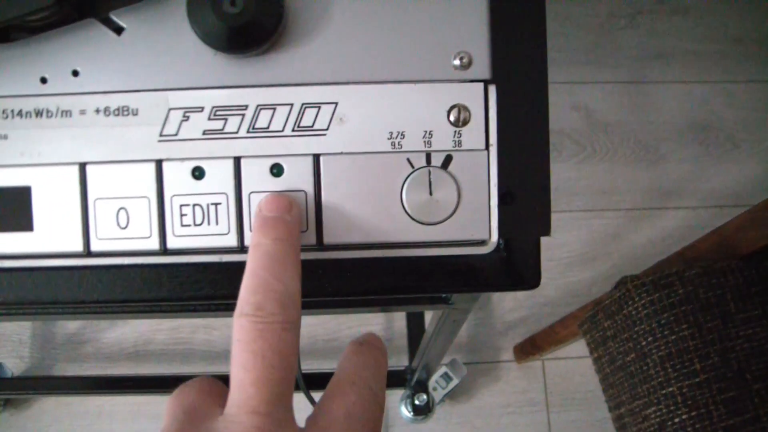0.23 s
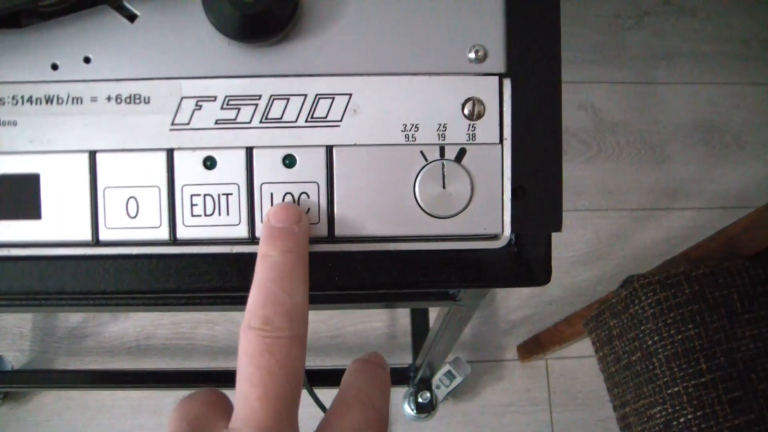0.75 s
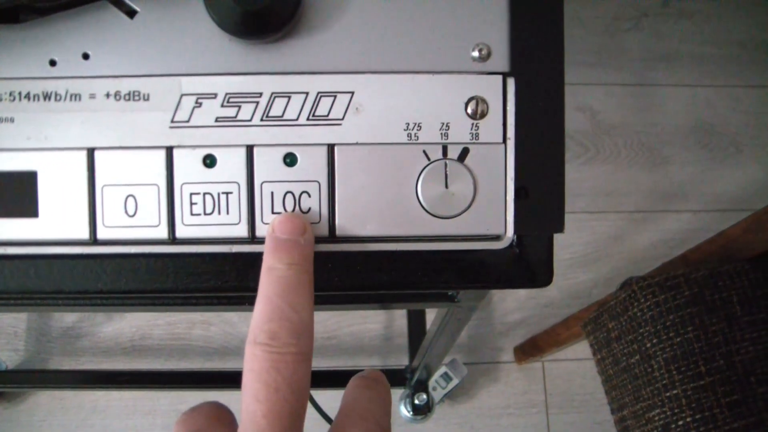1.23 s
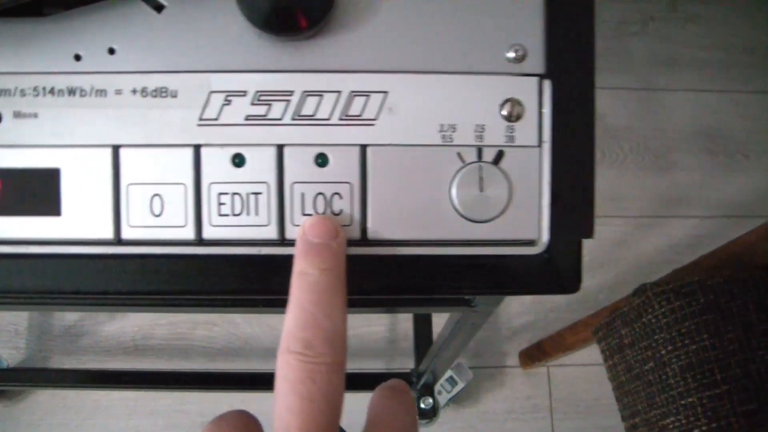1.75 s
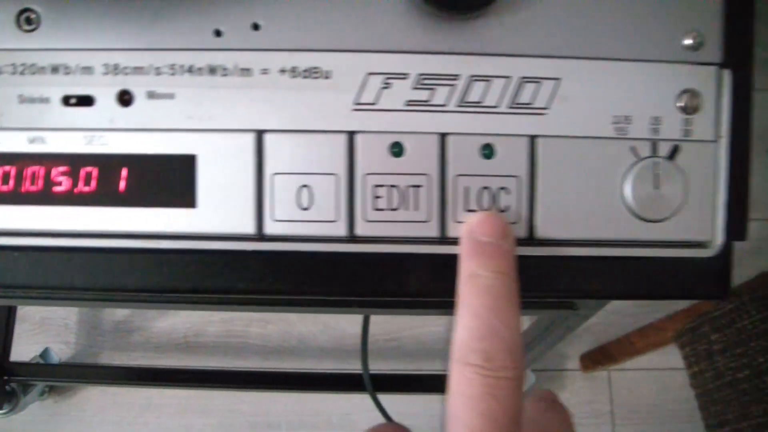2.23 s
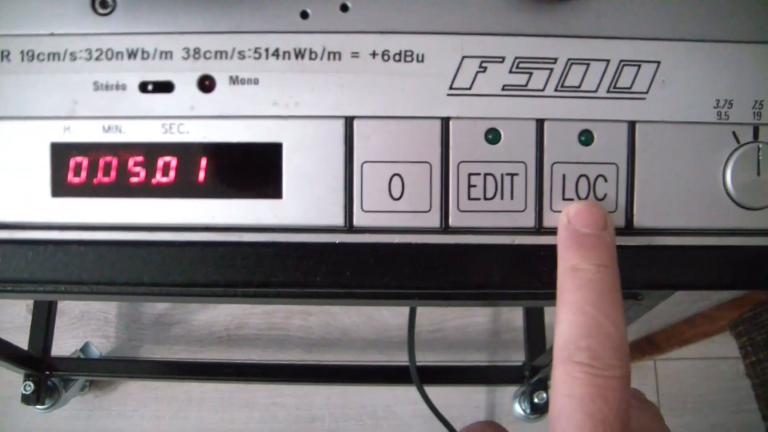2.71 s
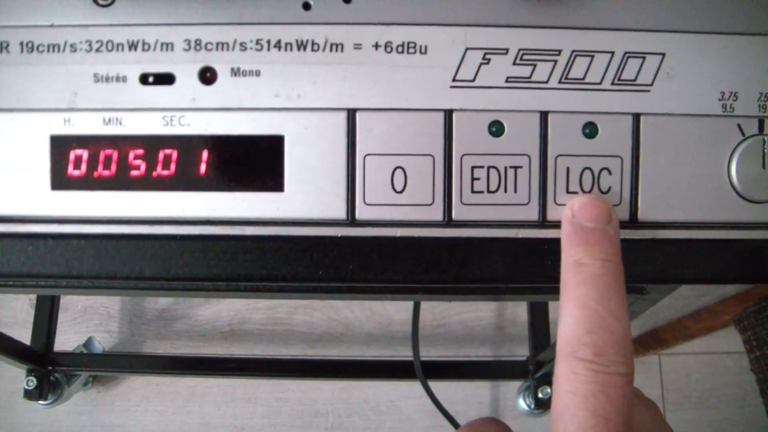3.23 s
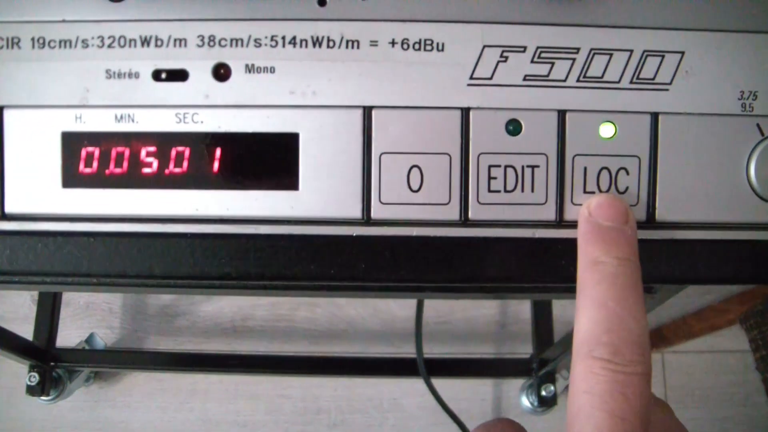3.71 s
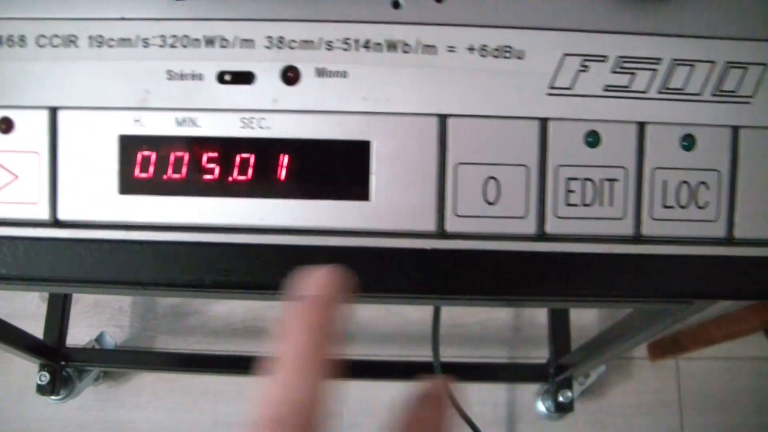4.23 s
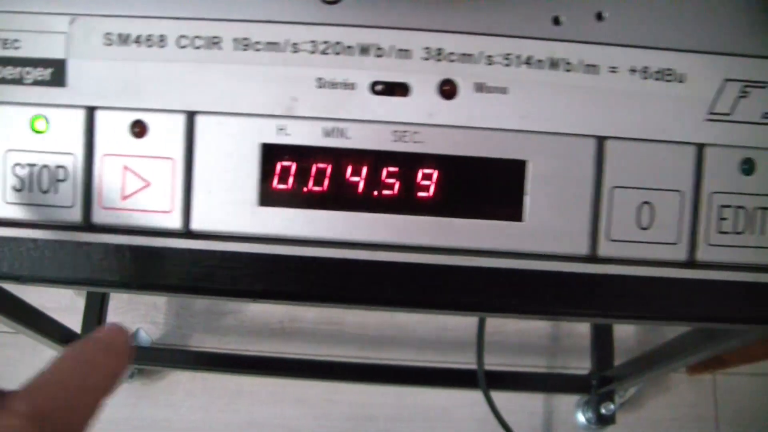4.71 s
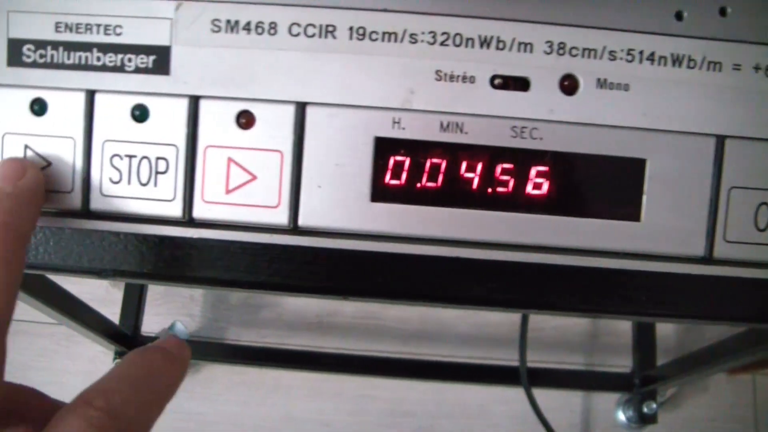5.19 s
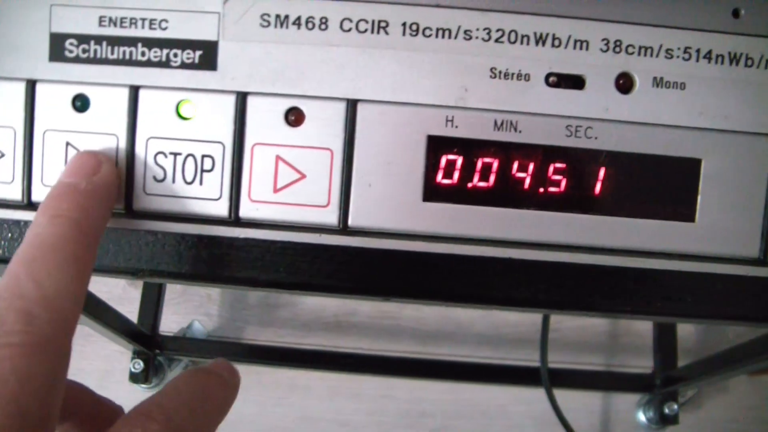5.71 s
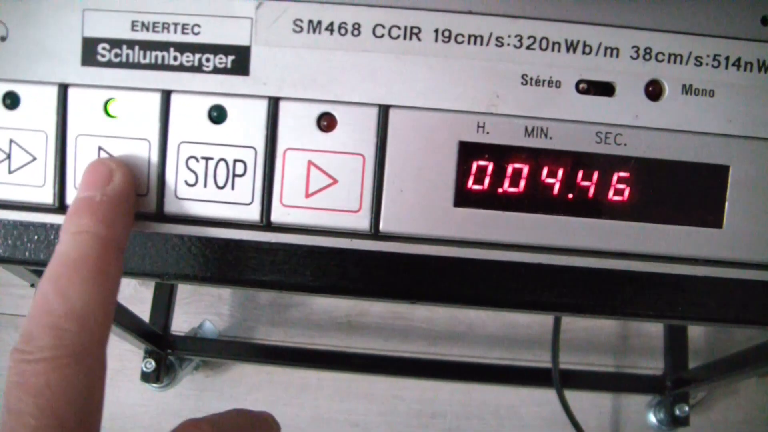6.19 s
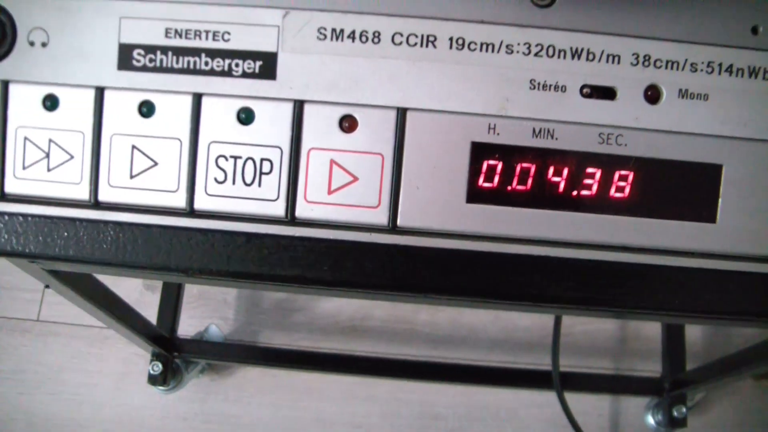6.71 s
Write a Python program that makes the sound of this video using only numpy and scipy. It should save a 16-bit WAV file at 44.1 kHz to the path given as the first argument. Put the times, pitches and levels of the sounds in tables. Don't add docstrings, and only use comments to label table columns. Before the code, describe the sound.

Close stereo pickup in a small, lightly reverberant room: soft hiss, mains hum, faint high whistle and a far wall clock alternating tick and tock. A cluster of clicks ends in one hard, bright mechanical blow with a short springy rattle. Immediately the reels start turning, separate soft knocks blurring into a rough metallic purr that rises steadily in pitch, brightness and loudness, with airy tape hiss on top.

```python
import sys
import numpy as np
from scipy import signal
from scipy.fft import rfft, irfft, next_fast_len
from scipy.io import wavfile
from scipy.ndimage import map_coordinates

SR = 44100
rng = np.random.default_rng(int(sys.argv[2]) if len(sys.argv) > 2 else 0)


def invert_db(level):
    return 10 ** (np.asarray(level, dtype=float) / 20)


def inscribe(sig):
    pcm = np.round(np.clip(np.atleast_2d(sig).T, -1, 1) * 32767)
    wavfile.write(sys.argv[1], SR, pcm.astype(np.int16))


N = 306495
TIME_S = np.arange(N) / SR
BALLS, INNER_SHARE = 11, .6285


def unit(x):
    return x / np.sqrt(np.mean(x ** 2) + 1e-20)


def along(points, hz):
    f, v = np.transpose(points)
    return np.interp(np.log(hz + 1), np.log(f + 1), v)


def curves(rows):
    s, *cols = np.transpose(rows)
    return [np.interp(TIME_S, s, c) for c in cols]


def wobble(rate):
    knots = rng.standard_normal(int(N * rate / SR) + 4)
    return map_coordinates(knots, [TIME_S * rate])


def filtered(x, response):
    m = next_fast_len(N + SR // 2)
    return irfft(rfft(x, m) * response(np.fft.rfftfreq(m, 1 / SR)), m)[..., :N]


def band(x, lo_hz, hi_hz):
    return unit(filtered(x, lambda f: 1 / (1 + (lo_hz / (f + 1)) ** 8) / (1 + (f / hi_hz) ** 8)))


def resonances(peaks):
    def response(f):
        total = 0
        for k, (hz, width, db) in enumerate(peaks):
            damping = 1j * f * width
            total = total + (-1) ** k * invert_db(db) * damping / (hz * hz - f * f + damping)
        return total
    return response


def ring(modes, t, scatter_db):
    out = 0
    for hz, db, t60 in modes:
        out = out + invert_db(db + scatter_db * rng.normal() - 60 * t / t60) * np.sin(2 * np.pi * hz * t)
    return out


def add_at(out, s, sound):
    out[round(s * SR):][:len(sound)] += sound


def placed(x, lag, pan_db):
    sides = np.array([[1], [-1]])
    return filtered(x, lambda f: invert_db(pan_db * sides) * np.exp(1j * np.pi * f * lag / SR * sides))


def race(rate_hz, sway, scatter_db):
    passes = np.cumsum(rate_hz) / SR + sway
    at = np.flatnonzero(np.diff(np.floor(passes)) > 0)
    late = (np.ceil(passes[at]) - passes[at]) / (passes[at + 1] - passes[at])
    size = invert_db(scatter_db * rng.standard_normal(len(at))) * np.sqrt(SR / 150)
    knocks = np.bincount(at, size * (1 - late), N) + np.bincount(at + 1, size * late, N)
    return filtered(knocks, lambda f: (1j * f / (800 + 1j * f)) ** 2)


# multiple of the knock rate, shaft steps aside,
# level over their neighbours in dB.
OVERTONES = [(2, -2, -8), (4, -4, -5), (7, 0, 3), (9, 0, 1), (11, 0, 3), (12, -1, 0), (16, 0, 9),
             (18, 1, 6), (20, 0, 4), (21, 0, 7), (22, 0, 7), (23, 0, 10.5), (27, 1, 8), (28, 1, 7)]


def singers(inner_hz, shaft):
    knock_phase = BALLS * INNER_SHARE * shaft
    out = 0
    for k, step, db in OVERTONES:
        bloom = 1
        if k > 12:
            hz = k * inner_hz
            bloom = 1.6 * np.clip(hz / 2900, 0, 1) ** 5 * np.clip(3500 / hz, 0, 1) ** 14
        tone = np.sin(k * knock_phase + step * shaft + .15 * wobble(20))
        out = out + bloom * invert_db(db + 1.2 * wobble(5)) * tone
    return 2 * inner_hz / np.sqrt(SR * 150) * out


# time in seconds, inner-race knocks a second.
SPIN_UP = [(4.4, 2), (4.8, 26), (5.2, 56), (5.6, 86), (6.6, 164.1), (6.95, 190.4)]
# frequency in Hz, width in Hz, level in dB.
DECK_MODES = [(268, 12, -8), (320, 25, -6), (627, 41.4, -4.5), (757.5, 37, -5.5), (1106, 210, -13),
              (1390, 57, -5), (1566, 49, -9), (1904, 63, -2), (2126, 93, 1), (2280, 30, 1.5),
              (2976, 130, -8.5), (3335, 330, -4), (3870, 200, -7), (4264, 110, -3), (4670, 220, -6.5),
              (7340, 220, 11)]
# frequency in Hz, level in dB per Hz.
WHIRR_TONE = [(120, -45), (200, 0.5), (601, -7), (883, -13.5), (2090, -1.5), (2560, 5), (3310, -3.5),
              (3690, -19.5), (7270, -40.5), (11900, -40), (13300, -39), (15100, -33.5), (16000, -57)]
# frequency in Hz, left over right in dB.
BEARING_LEAN = [(60, 2), (110, -0.5), (200, -2.5), (380, 0), (700, -0.5), (1290, 0.5), (2380, 2.5),
                (4400, 4.5), (8120, -6), (15000, 3)]
# time in seconds, hiss lift in dB.
TAPE_BRUSHES = [
    (5.01, 4),
    (5.89, 4),
]


def spool():
    inner_hz, = curves(SPIN_UP)
    full_hz = 190
    doublings = np.log2(inner_hz / full_hz)
    shaft = 2 * np.pi * np.cumsum(inner_hz / (BALLS * INNER_SHARE)) / SR
    inner = race(inner_hz, .009 * np.sin(shaft) + .003 * wobble(40), scatter_db=2)
    inner *= 1 + .25 * np.cos(shaft)
    outer = race(inner_hz * (1 / INNER_SHARE - 1), .002 * wobble(40), scatter_db=2)
    rolling = rng.standard_normal((2, N)) * invert_db(1.3 * wobble(60) + .4 * wobble(9))
    near = placed(inner + singers(inner_hz, shaft) + invert_db(-6) * rolling[0], lag=5.5, pan_db=0)
    far = placed(invert_db(-4) * outer + invert_db(-8) * rolling[1], lag=4, pan_db=0)

    def lean(f):
        return invert_db(along(BEARING_LEAN, f) * [[.5], [-.5]])

    def deck(f):
        return (resonances(DECK_MODES)(f) + invert_db(along(WHIRR_TONE, f) - 14.5)) * lean(f)

    x = filtered(near + far, deck)
    low_db = -8.6 - 1.9 * doublings
    mix = band(x, 940, 2414) + invert_db(low_db + 1.16 * wobble(3.98)) * band(x, 195, 970)
    plate_db = np.minimum(-25 - 8.5 * doublings, -5.5)
    plate_awake = np.clip(inner_hz / 36, 0, 1) ** 2
    mix += invert_db(plate_db) * plate_awake * band(x, 2020, 2450)
    presence = 0.26 * (inner_hz / 150) * band(x, 3500, 3400)
    presence += (inner_hz / 170) ** 0.72 * band(x, 3100, 4760)
    mix += invert_db(-4.2) * presence
    hiss_db = -0.8 - 9 * (1 - inner_hz / full_hz)
    for s, lift_db in TAPE_BRUSHES:
        hiss_db = hiss_db + lift_db * np.exp(-((TIME_S - s) / .05) ** 2)
    hiss = filtered(rolling, lambda f: invert_db(along(WHIRR_TONE, f)) * lean(f))
    mix += invert_db(hiss_db) * band(hiss, 5050, 13900)
    roll_s, gather_s = 4.4, 0.11
    start = np.clip((TIME_S - roll_s) / gather_s, 0, 1)
    return invert_db(-36.6 + 4.0 * doublings) * start * mix


# start in seconds, peak in dB, ring in Hz, thud in dB, sizzle in dB.
CONTACTS = [
    (4.2605, -21, 2050, -5, -22),
    (4.2715, -17, 1620, -8, -5),
    (4.2995, -13, 1540, -11, -26),
    (4.3115, -10.5, 3300, 2, -1),
    (4.3214, -4.5, 3720, -6, -1),
]
# frequency in Hz, width in Hz, level in dB.
CHASSIS_MODES = [(271, 110, -6), (623, 30, 3.5), (1273, 66, -4), (2010, 130, -7.5), (2870, 52, -26),
                 (3390, 36, 1), (3790, 210, -5), (4500, 39, -0.5), (5190, 120, -6), (6020, 110, -9),
                 (6350, 150, -14), (6970, 59, -11), (7400, 180, -27), (9000, 120, -17), (9400, 33, -19),
                 (9500, 160, -10.5)]


def clunk():
    out, dull, bright = np.zeros((3, N))
    t = np.arange(SR // 4) / SR
    for s, db, hz, thud_db, sizzle_db in CONTACTS:
        rise = invert_db(db) * (1 - np.exp(-t / .0003))
        own_t60 = 92 / hz
        modes = [(hz, -5, own_t60), (634, thud_db - 3, .07), (255, thud_db - 17, .12),
                 (315, thud_db - 16, .12), (930, thud_db - 13, .06)]
        own = ring(modes, t, scatter_db=.1)
        noise = rng.standard_normal((2, len(t))) * invert_db(-60 * t / 0.061)
        sizzle = invert_db(sizzle_db - 10.5) * np.diff(noise[0], prepend=0)
        add_at(out, s, rise * (own + sizzle))
        add_at(dull, s, rise * noise[1])
        add_at(bright, s, rise * noise[1] * invert_db(0.48 * sizzle_db + 3.0))

    def metal(f):
        return resonances(CHASSIS_MODES[2:])(f) / (1 + 1j * f / 4000) - resonances([(4500, 2300, -5)])(f)

    def light_armature(f):
        return (1j * f / (150 + 1j * f)) ** 2 / (1 + 1j * f / 14000)

    shaken = filtered(dull, resonances([(1460, 1600, -5.5)])) + filtered(bright, metal)
    drop_db = -9 * np.clip((TIME_S - 4.3285) / 0.0033 + .5, 0, 1)
    return filtered(invert_db(drop_db) * (out + invert_db(3.5) * shaken), light_armature)


def dying(db, rise_s, shaking, settling):
    shake_s, settle_s = 4.326, 4.41
    t = np.clip(TIME_S - shake_s, 0, None)
    knee = settle_s - shake_s
    fall_db = shaking * np.minimum(t, knee) + settling * np.clip(t - knee, 0, None)
    return (1 - np.exp(-t / rise_s)) * invert_db(db - fall_db)


# frequency in Hz, level in dB per Hz.
LEVER_TONE = [(88, -57), (150, -17), (244, 6), (466, -39), (612, -8.5), (1500, -17), (3770, -10),
              (11500, -22), (15100, -50), (16000, -82)]


def shudder():
    a, b = filtered(rng.standard_normal((2, N)),
                    lambda f: resonances(CHASSIS_MODES)(f) + invert_db(along(LEVER_TONE, f) - 1.5))
    pair = np.array([a + 1.07 * b, a - 1.1 * b])
    rattle = dying(-23.5, .004, shaking=89, settling=150)
    loose_spring = dying(-42.5, .004, shaking=50, settling=50)
    boom = dying(-34, 0.06, shaking=52, settling=61)
    sizzle = dying(-26, 0.06, shaking=115, settling=165)
    out = (rattle + loose_spring) * band(pair, 780, 5250)
    out += boom * band(band(a, 190, 1060), 184, 1240)
    return out + sizzle * band(pair + a, 5260, 14000)


# multiple of the mains, level in dB.
HUM_PARTIALS = [(1, -59), (2, -59), (3, -78), (4, -59), (5, -75), (6, -73), (7, -76), (9, -76), (10, -72)]
# steps of half the mains from the carrier, level in dB.
WHISTLE_LINES = [(-12, -79), (-10, -79), (-8, -75), (-6, -72), (-4, -69), (-3, -78), (-2, -64), (-1, -65),
                 (0, -53.5), (1, -70), (2, -76), (3, -78), (8, -82), (10, -82), (12, -83)]


def electrics():
    mains_hz, whistle_hz = 50.05, 13025
    turn = 2 * np.pi * TIME_S
    load_db, = curves([(4.3, 1), (4.6, -4.5)])
    hum, whistle = np.zeros((2, N))
    for k, db in HUM_PARTIALS:
        level_db = db + 3 + .8 * wobble(5) + load_db * (k == 1)
        hum += invert_db(level_db) * np.sin(k * mains_hz * turn + rng.uniform(0, 6))
    for k, db in WHISTLE_LINES:
        whistle += invert_db(db + 3) * np.sin((whistle_hz + 25 * k) * turn + np.pi / 2 * (k != 0))
    coil = invert_db(-70.5) * unit(filtered(rng.standard_normal((2, N)), resonances([(9340, 240, 0)])))
    return hum * invert_db([[-.3], [.3]]) + whistle * invert_db([[.8], [-.8]]) + coil


# start in seconds, peak in dB.
TICK_TIMES = [(0.3282, -39.5), (1.3251, -41), (2.3234, -39.5), (3.3263, -39.5)]
# start in seconds, peak in dB.
TOCK_TIMES = [(0.8462, -43), (1.8414, -44), (2.8455, -41), (3.8492, -40.5)]
# frequency in Hz, level in dB, t60 in seconds.
TICK_MODES = [(1150, 0, .05), (1700, -6, .02), (2050, 1, .03), (2400, -7, .02), (3000, -6, .02)]
# frequency in Hz, level in dB, t60 in seconds.
TOCK_MODES = [(1150, 1, .05), (1320, 2, .05), (2300, -6, .02), (3400, -8, .015), (4060, -2, .035),
              (5700, -10, .03)]
# start in seconds, level in dB, pitch in Hz.
BUMPS = [
    (.96, -45.5, 530),
    (2.776, -50, 4500),
]


def clock():
    out, body = np.zeros((2, N))
    t = np.arange(SR // 4) / SR
    for events, modes in ((TICK_TIMES, TICK_MODES), (TOCK_TIMES, TOCK_MODES)):
        for s, db in events:
            rattle = invert_db(db - 60 * t / 0.094) * rng.standard_normal(len(t))
            case = signal.fftconvolve(rattle, ring(modes, t, scatter_db=1.0))[:len(t)]
            add_at(out, s, invert_db(-34) * case)
            after = invert_db(db - 8) * ring(modes, t, scatter_db=1.5) * (1 - np.exp(-t / 0.0025))
            add_at(out, s + .012, after)
            add_at(body, s, rattle)
    for s, db, hz in BUMPS:
        modes = [(hz, db, 40 / hz), (1.12 * hz, db - 8, 70 / hz), (0.61 * hz, db - 3.5, 30 / hz)]
        add_at(out, s, ring(modes, t, scatter_db=.5))
    return out + filtered(body, resonances([(1370, 170, -0.5), (2350, 800, -1.5)]))


# frequency in Hz, t60 in seconds.
ROOM_DECAY = [(200, 1), (1000, 0.28), (4000, 0.54), (10000, 0.18)]


def room(x):
    hz, t, z = signal.stft(rng.standard_normal((2, SR // 2)), SR, nperseg=256)
    decay = invert_db(-60 * t / along(ROOM_DECAY, hz)[:, None])
    tail = signal.istft(z * decay, SR, nperseg=256)[1]
    delayed = np.pad(x, (130, 0))[None]
    return signal.fftconvolve(delayed, tail / np.linalg.norm(tail[0]), axes=1)[:, :N]


# frequency in Hz, level in dB per Hz.
AIR_TONE = [(20, 0.5), (45, -5.5), (75, -3.5), (125, -7.5), (170, -10.5), (500, -15.5), (800, -16),
            (1200, -16), (3000, -20), (10000, -23.5), (12000, -23.5), (13200, -50), (14700, -21),
            (15800, -61)]
# frequency in Hz, left-right likeness from -1 to 1.
AIR_LIKENESS = [(45, -0.53), (130, 0.23), (290, -0.22), (640, 0.34), (1400, 0.042), (3000, 0.075)]


def air():
    def mid_side(f):
        turn = np.arccos(np.clip(along(AIR_LIKENESS, f), -1, 1)) / 2
        return invert_db(along(AIR_TONE, f)) * [np.cos(turn), np.sin(turn)]

    mid, side = filtered(rng.standard_normal((2, N)), mid_side)
    rumble = band(rng.standard_normal((2, N)), 6.2, 28)
    return invert_db(-53.5) * unit(np.array([mid + side, mid - side])) + invert_db(-54.5) * rumble


def scene():
    blow, reels, ticks = clunk(), spool(), clock()
    left, right = invert_db(-5) * room(blow) + invert_db(-7.5) * room(reels[0]) + invert_db(3.0) * room(ticks)
    side = filtered(left - right, lambda f: f ** 2 / (f ** 2 + 900 ** 2))
    echo = np.array([left + right + side, left + right - side]) / 2
    machine = placed(blow, lag=-1.3, pan_db=1.3) + shudder() + reels + electrics()
    return machine + invert_db(-2.5) * ticks + echo + air()


def low_pass(x):
    return signal.sosfilt(signal.butter(12, 16490, fs=SR, output="sos"), x)


def record(dry):
    held = dry / (1 + np.abs(dry / .85) ** 6) ** (1 / 6)
    mix = filtered(held, lambda f: 0.0026 + 1 / (1 + (f / 15300) ** 60))
    return low_pass(mix)


dry = scene()
out = record(dry)
inscribe(out)
```